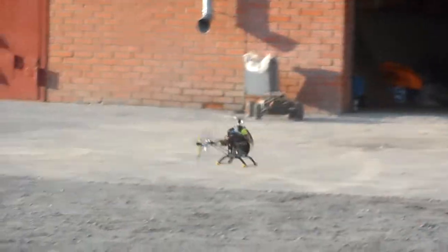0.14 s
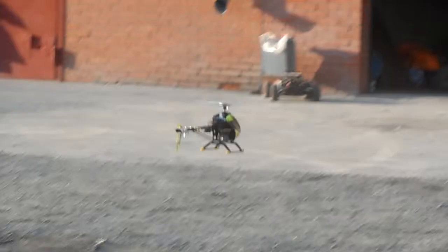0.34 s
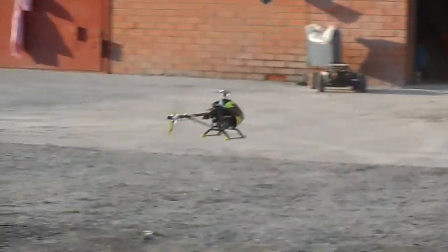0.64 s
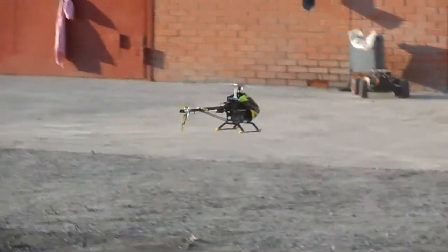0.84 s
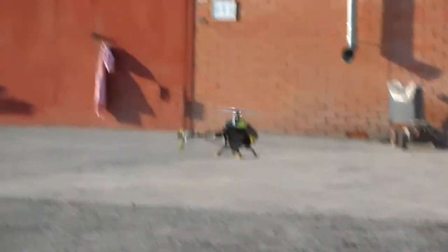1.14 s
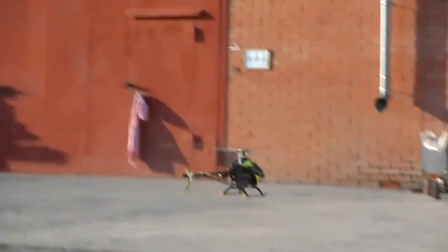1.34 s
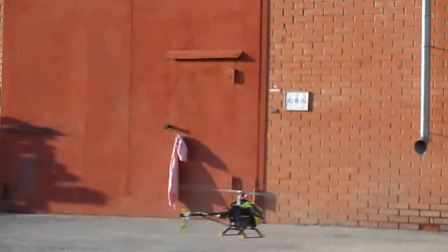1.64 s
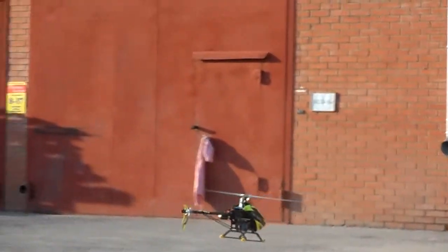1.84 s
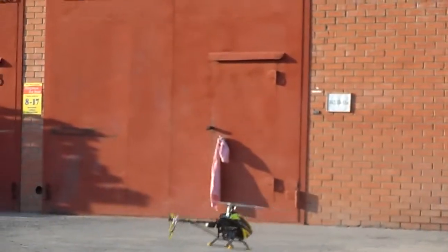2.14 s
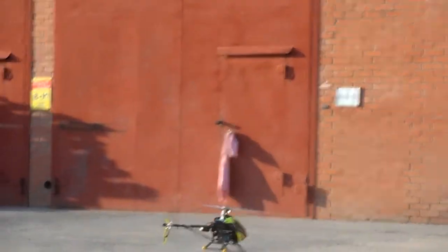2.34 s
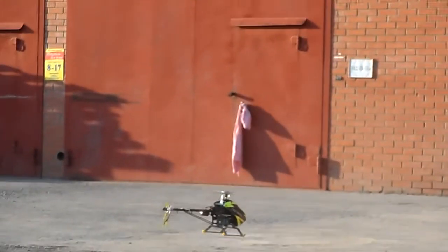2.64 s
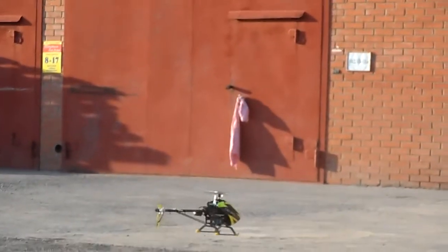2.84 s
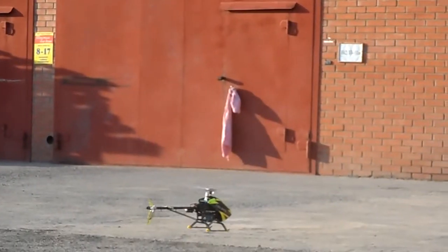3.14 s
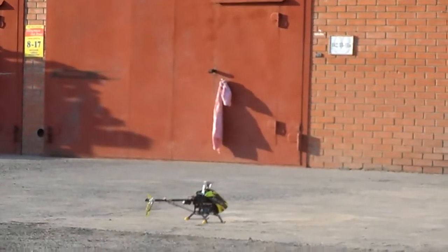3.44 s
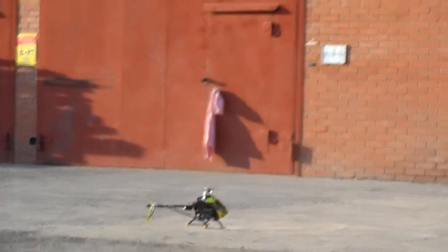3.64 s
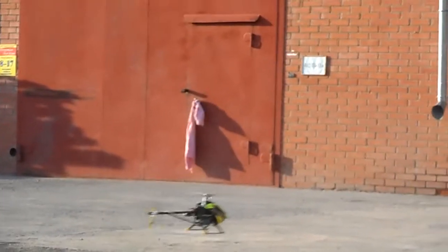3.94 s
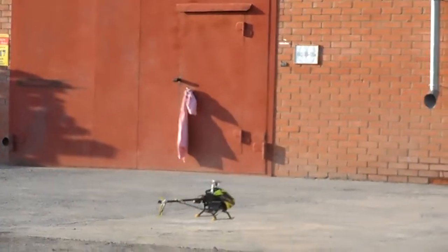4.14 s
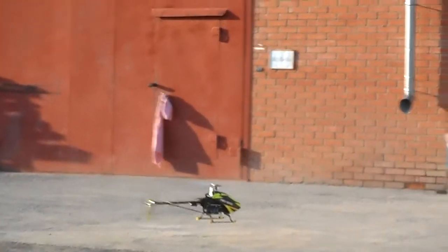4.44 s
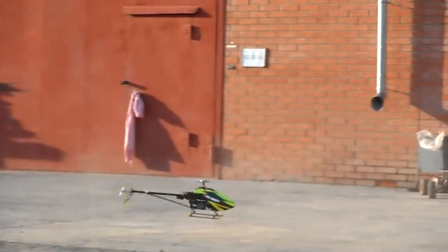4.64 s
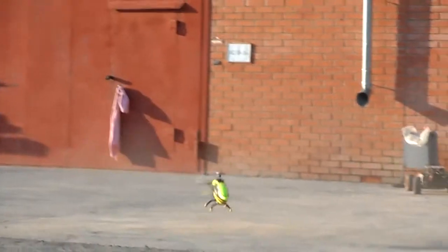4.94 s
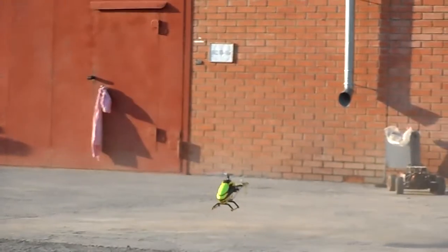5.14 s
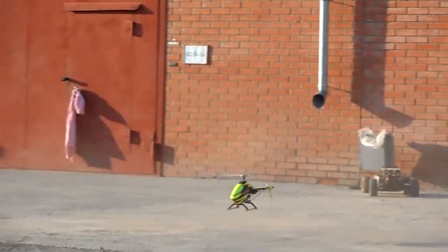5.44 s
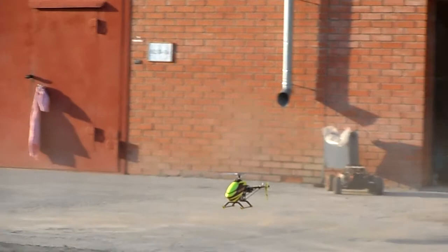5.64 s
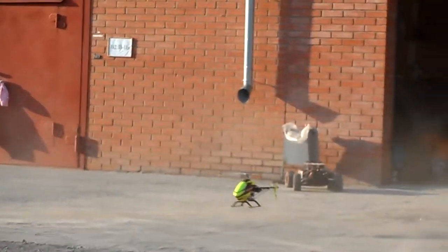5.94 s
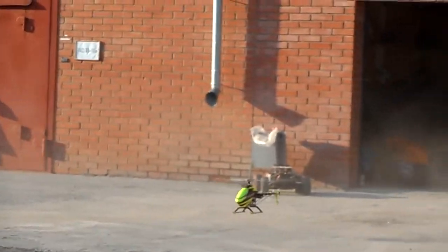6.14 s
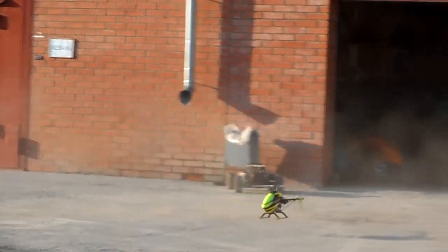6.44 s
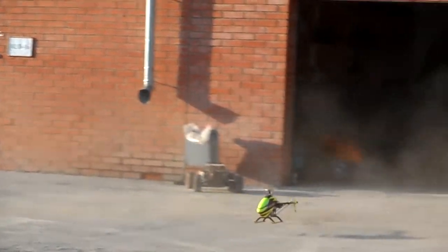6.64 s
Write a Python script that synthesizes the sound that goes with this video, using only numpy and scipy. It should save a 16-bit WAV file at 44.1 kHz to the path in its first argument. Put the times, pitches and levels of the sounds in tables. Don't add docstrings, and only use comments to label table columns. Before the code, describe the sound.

Loud wind buffeting batters an unprotected microphone over a model helicopter's high metallic gear whine, which swells with a lower tonal hum as it turns.

```python
import sys
import numpy as np
from scipy import signal
from scipy.fft import irfft
from scipy.io import wavfile
from scipy.ndimage import uniform_filter1d

SR = 44100
rng = np.random.default_rng(int(sys.argv[2]) if len(sys.argv) > 2 else 0)


def boost(x):
    u = np.asarray(x, float) / 20
    return 10 ** u


def unload_audio(sound):
    columns = np.transpose(np.atleast_2d(sound))
    steps = np.round(np.clip(columns, -1, 1) * 32767)
    wavfile.write(sys.argv[1], SR, steps.astype(np.int16))


N = 298838

TAIL_PER_MOTOR, ROTOR_PER_MOTOR = 0.43303, 0.092593
BLOCK, FIRST_SEAM, GLITCH = 1024, 1004, 16


def rms_one(x):
    return x / np.sqrt(np.mean(x ** 2) + 1e-20)


def evened(x, count):
    power = uniform_filter1d(uniform_filter1d(x ** 2, size=count), size=count)
    return x / np.sqrt(power + 1e-20)


def in_time(rows):
    s, *columns = np.transpose(rows)
    return [np.interp(np.arange(N) / SR, s, c) for c in columns]


def drift(rate_hz, coarse=False):
    r = np.exp(-80 * np.pi * rate_hz / SR)
    slow = signal.lfilter([1], [1, -2 * r, r * r], rng.standard_normal(N // 40 + 2002))[2000:]
    slow = rms_one(slow)
    if coarse:
        return rms_one(slow)[:(N + 39) // 40]
    return np.interp(np.arange(N) / 40, np.arange(len(slow)), slow)


def band(x, low_hz, high_hz, order=2):
    return signal.sosfilt(signal.butter(order, [low_hz, high_hz], "band", fs=SR, output="sos"), x)


def swells(rows, rest_db):
    t = np.arange(0, N + 40, 40) / SR
    power = boost(2 * rest_db)
    for s, length, db in rows:
        reach = 0.42 * length
        power = power + boost(2 * db) * np.exp(-2 * np.abs((t - s) / reach) ** 1.56)
    return np.interp(np.arange(N) / SR, t, 10 * np.log10(power))


def heading():
    # time in seconds, nearness in dB, tail swung toward us in dB,
    # downwash on the ground in dB.
    pose = [(0, 0, -0.5, 5), (.75, -0.7, -1, 3), (1.1, -1.2, 3, 6), (1.5, 0.3, 2, 6.5),
            (2.17, -1, 1.5, 7.5), (2.38, -3.5, 3.5, 7), (2.62, 0, 0.5, 4.5), (2.9, -2, 2.5, 7),
            (3.15, -3.5, 7, 10), (3.6, -0.5, 3, 3), (3.75, -1.5, 3.5, 6), (4.25, -0.5, 4, 4.5),
            (4.6, -1.2, 4, 5.5), (5.1, -2, 9, 8), (5.52, 6.5, 3, 13.5), (5.9, 3, 3, 12),
            (6.25, -2, -0.5, 6.5), (6.78, -5, 5.5, 11)]
    # share of tail swing, share of downwash, offset in dB.
    motor_shares = (0.031, 0.61, -3)
    near, tail, wash = in_time(pose)
    of_tail, of_wash, offset_db = motor_shares
    return [near + wash, near + tail, near + of_tail * tail + of_wash * wash + offset_db, near]


def toward_us(heading_db, hz):
    curve_hz = [1400, 4900, 6700, 12400]
    place = np.interp(np.log(hz), np.log(curve_hz), np.arange(len(curve_hz)))
    k = min(int(place), len(curve_hz) - 2)
    return heading_db[k] + (place - k) * (heading_db[k + 1] - heading_db[k])


def beams(t):
    # time in seconds, beam (+) or null (-) in dB.
    sweeps = [
        [(.4, 6), (1.15, 3), (2.7, 3), (2.97, -1), (3.7, -0.5), (4.5, 5), (5.45, -4), (6.2, -4), (6.7, -8)],
        [(.15, 9), (.65, 11.5), (1.05, 5), (2.7, -1), (3.7, 2), (5.1, 6), (5.5, -1), (5.9, 6), (6.35, -9)],
        [(.2, 6), (.9, 1.5), (1.8, -1), (3.8, -1), (4.9, 1), (5.5, 3)],
        [(1.8, -18), (2.4, 9), (3.7, -13), (4.95, 6), (5.45, -7), (6.0, 5.5), (6.45, 10)],
        [(.1, -8), (1.0, 1), (2.6, 1), (3.8, 12), (4.95, 14), (5.6, 6), (6.2, 2), (6.7, -4)],
        [(.2, 4), (.9, -3), (1.3, 4), (1.8, -3), (2.2, -3), (2.6, 3.5), (3.4, 4), (3.8, 2), (4.2, 2),
         (4.92, -5), (5.6, 3)],
    ]
    return [sum(db * np.exp(-((t - s) / 0.25) ** 2) for s, db in lobe) for lobe in sweeps]


def drive_train(turns, heading_db, fade_db, flutter_db):
    # multiple of tail shaft turns, level in dB rms.
    tail_gear = [(25, -46), (26, -58), (27, -48), (28, -62), (30, -58), (31, -50.5), (49, -51), (50, -52),
                 (51, -54), (60, -52), (62, -46), (64, -58)]
    # multiple of motor turns, level in dB rms.
    motor = [(14, -53), (15, -51), (16, -41), (17, -45), (18, -53), (21, -51), (25, -57), (29, -54),
             (30, -44), (31, -46)]
    # multiple of main rotor turns, level in dB rms.
    main_gear = [(312, -46), (322, -55), (328, -49), (336, -47)]
    # motor multiple, rotor multiple added, level in dB rms.
    gear_wobble = [(16, 1, -53), (16, 2, -47), (16, 3, -51), (17, -2, -54), (17, -1, -50), (17, 1, -52),
                   (17, 2, -49), (31, -12, -51), (31, 4, -51)]
    lobe_tones_hz = [
        [4836, 7031, 11104, 11948],
        [6204, 12822, 12868],
        [5552, 6618, 12408],
        [5790],
        [4657, 5017, 5376],
        [4478],
    ]
    lines = [(round(k) * TAIL_PER_MOTOR, db) for k, db in tail_gear]
    lines += [(round(k), db) for k, db in motor]
    lines += [(round(k) * ROTOR_PER_MOTOR, db) for k, db in main_gear]
    lines += [(round(k) + round(j) * ROTOR_PER_MOTOR, db) for k, j, db in gear_wobble]
    mean_motor_hz = turns[-1] * SR / N
    lobes_db = beams(np.arange(0, N, 40) / SR)
    heading_db = [db[::40] for db in heading_db]
    out = np.zeros(N)
    for multiple, db in lines:
        hz = multiple * mean_motor_hz
        wander_db = fade_db * drift(0.36, coarse=True)
        for lobe_db, tones in zip(lobes_db, lobe_tones_hz):
            if np.abs(hz - np.array(tones)).min() < 120:
                wander_db = lobe_db
        flutter = flutter_db * drift(7.0, coarse=True)
        level_db = db + toward_us(heading_db, hz) + wander_db + flutter
        height = np.repeat(np.sqrt(2) * boost(level_db), 40)[:N]
        out += height * np.sin(2 * np.pi * (multiple * turns + rng.random()))
    return out


def tail_rotor(turns):
    # centre in seconds, length in seconds, level in dB rms.
    blade_swells = [
        [(2.0, 0.4, -46), (3.15, 0.86, -42), (3.58, 0.27, -41.5), (4.85, 0.16, -41), (5.5, 0.53, -25),
         (5.82, 0.26, -33), (6.08, 0.34, -31), (6.45, 0.16, -37), (6.64, 0.38, -35.5)],
        [(.3, .8, -63), (3.6, 0.11, -45), (4.72, .4, -48), (5.6, 0.5, -52), (6.0, 0.23, -45), (6.27, 0.23, -46),
         (6.58, 0.25, -45.5)],
        [(3.1, .4, -56), (3.6, 0.48, -51), (3.95, 0.6, -48), (5.0, 0.49, -36.5), (6.1, 0.82, -60)],
    ]
    rests_db = [-54, -60, -59]
    blade_phase = 2 * 2 * np.pi * TAIL_PER_MOTOR * turns
    out = np.zeros(N)
    for k, (rows, rest_db) in enumerate(zip(blade_swells, rests_db), start=1):
        height = np.sqrt(2) * boost(swells(rows, rest_db) + 1.6 * drift(20.0))
        out += height * np.sin(k * blade_phase + 0.39 * drift(1.3))
    return out


def main_rotor(turns, wash_db):
    # multiple of main rotor turns, level in dB rms.
    blade_orders = [
        (2, -36),
        (4, -42.5),
    ]
    rotor = 2 * np.pi * ROTOR_PER_MOTOR * turns
    out = np.zeros(N)
    for k, db in blade_orders:
        level_db = db + 0.4 * (wash_db - 10.5) + 2.3 * drift(5.4)
        out += np.sqrt(2) * boost(level_db) * np.sin(round(k) * rotor + 0.33 * drift(5.4))
    return out


def blade_hiss(turns, heading_db, patchy_db, chop, grind):
    # frequency in Hz, density in dB per Hz.
    spectrum = [(150, -111), (450, -74), (1000, -78), (1400, -76.5), (1850, -82), (2400, -74),
                (4000, -75.5), (5400, -75), (7700, -75.5), (10000, -70), (12900, -74.5), (13600, -84),
                (14600, -88), (15600, -92)]
    # frequency in Hz, width in Hz, level in dB.
    resonances = [
        (4700, 670, -4),
        (6870, 740, 1.5),
        (8580, 410, -3),
        (12740, 1150, 3.5),
    ]
    edges = 120 * 2 ** np.arange(0, 7.1, 1 / 4)
    white = rng.standard_normal((2, N))
    hz, db = np.transpose(spectrum)
    together = drift(30.0)
    out = np.zeros(N)
    for k, (low, high) in enumerate(zip(edges, edges[1:])):
        centre = np.sqrt(low * high)
        level_db = np.interp(np.log(centre), np.log(hz), db) + toward_us(heading_db, centre)
        level_db = level_db + patchy_db * (0.74 * together + drift(3.5))
        out += boost(level_db) * band(white[k % 2], low, high)
    out *= np.sqrt(SR / 2)
    rotor = 2 * np.pi * ROTOR_PER_MOTOR * turns
    rung = np.zeros(N)
    for ring_hz, width_hz, ring_db in resonances:
        r = np.exp(-np.pi * width_hz / SR)
        poles = [1, -2 * r * np.cos(2 * np.pi * ring_hz / SR), r * r]
        ring = signal.lfilter([(1 - r * r) / 2, 0, (r * r - 1) / 2], poles, out)
        rung += boost(ring_db) * ring * (1 + chop * np.sin(rotor + 2 * np.pi * rng.random()))
    return (out + rung) * (1 + grind * np.sin(2 * np.pi * turns))


def shaft_buzz(turns, heading_db):
    multiple = np.arange(3, 72)
    uneven = boost(3 * rng.standard_normal((2, 69)))
    phase = np.exp(2j * np.pi * rng.random((2, 69)))
    shape = np.zeros((2, 2049), complex)
    shape[:, multiple] = np.minimum(multiple / 24, 1) ** 0.5 * uneven * phase
    place = TAIL_PER_MOTOR * turns % 1 * 4095
    buzz = np.zeros(N)
    for wave in irfft(shape):
        buzz += boost(4 * drift(4.0)) * np.interp(place, np.arange(4096), rms_one(wave))
    return boost(-53 + heading_db[1]) * buzz


def ground_echo(x):
    # time in seconds, near lag in ms, far lag in ms.
    lags = [
        (0, 0.51, 1.7),
        (1.2, 0.55, 1.98),
        (2.4, 0.61, 1.8),
        (3.2, 0.52, 1.84),
        (4.2, 0.6, 1.85),
        (5.0, 0.5, 1.82),
        (6.0, .55, 1.88),
        (6.78, 0.66, 1.88),
    ]
    shares = (.08, .25)
    out = x
    for share, ms in zip(shares, in_time(lags)):
        out = out + share * np.interp(np.arange(N) - ms * SR / 1000, np.arange(N), x)
    return out / np.sqrt(1 + np.sum(np.square(shares)))


def wind():
    # centre in seconds, length in seconds, large eddies in dB rms,
    # smaller eddies in dB rms.
    gusts = [(.19, 0.27, -10, -14), (.33, 0.18, 2, -8.5), (.49, 0.22, -4.5, -15), (.67, 0.24, -23, -13.5),
             (.86, 0.38, -10, -13), (1.03, 0.17, -1.7, -10), (1.17, 0.17, -9.5, -6.5),
             (1.33, 0.26, -4, -16), (1.47, 0.18, -5.5, -10), (1.58, 0.22, 2.7, -9.5),
             (1.77, 0.18, -5.5, -10.5), (1.93, 0.32, -11.5, -32), (2.25, 0.28, -13.5, -50),
             (2.42, 0.27, -13.5, -19.5), (2.58, 0.23, -14.5, -19), (2.839, 0.31, -11, -15.5),
             (2.968, 0.056, 0.5, -24), (3.12, 0.3, -4.5, -27), (3.321, 0.23, -6.5, -13),
             (3.462, 0.092, -11.5, -23.5), (3.86, 0.31, -13.5, -27), (4.1, 0.18, -10.5, -24),
             (4.422, 0.29, -0.6, -8), (4.67, 0.47, -3.5, -14), (4.93, 0.21, -2.5, -2.5), (5.21, 0.5, 3, -9),
             (5.5, 0.26, 0.5, -23), (5.669, .15, 1.5, -8.5), (6.02, 0.45, -19.5, -42),
             (6.66, 0.59, -26, -53), (.03, 0.11, -16, -27), (.25, 0.044, -14, -14), (.29, .05, -5, 2),
             (.46, 0.048, -6, -13), (.775, 0.047, -12, -18), (1.03, 0.057, -8, -15),
             (2.18, 0.033, -16.5, -28.5), (2.45, 0.027, -14, -19), (2.72, 0.1, -13.5, -18),
             (3.74, 0.081, -17, -36), (3.97, 0.078, -10, -21), (4.31, 0.035, -3, -9),
             (4.55, 0.17, -4.5, -12), (4.8, .12, 0, -8), (4.965, 0.054, -2, 0), (5.08, 0.047, -8, -19),
             (5.35, 0.31, -3, -13), (5.82, .15, -13.5, -34), (6.551, 0.072, -27, -43)]
    fine_db = [-28.5, -19, -19.5, -30, -25, -15.5, -22, -41, -34, -14, -30, -53, -55, -36, -48, -42, -37,
               -40, -39, -45, -39.5, -38, -33, -31, -22, -29, -44, -39, -42, -55, -33.5, -25.5, -17.5, -8.5,
               -16.5, -16, -59, -28, -51, -47, -27, -28, -29, -26, -8.5, -35, -34, -36, -52]
    # time in seconds, level in dB rms, bright edge in dB.
    buffets = [(0.18, -6.5, -36), (0.288, -0.5, -12), (0.377, -13.5, -29), (0.457, -11, -40),
               (0.511, -11, -20), (0.775, -16.5, -30), (0.812, -8, -29), (0.901, -12, -32),
               (1.023, -13, -9), (1.232, -13.5, -28), (1.301, -11, -8), (1.518, -15, -30),
               (1.595, -7.5, -28), (2.304, -17.5, -21), (2.355, -16, -30), (2.444, -11.5, -28),
               (2.49, -17, -28), (2.57, -15, -33), (2.758, -25, -28), (3.307, -26, -30), (3.335, -20, -25),
               (3.742, -35, 2), (3.808, -26, -4), (2.959, -24, -20), (3.472, -28, -7), (3.913, -21.5, -18),
               (3.98, -25, -4), (4.313, -38, -18), (4.435, -18, -27), (4.65, -21, -29), (4.788, -11.5, -5),
               (4.969, -2, -36), (5.259, 2.5, -11.5), (5.435, -7, -25), (0.235, -18.5, -12),
               (0.415, -10, -20), (0.691, -14.5, -22.5), (0.878, -15, -13), (1.065, -14, -18),
               (4.359, -13, -22), (4.468, -12.5, -17), (4.61, -23, -12), (2.599, -26.5, -27),
               (5.671, -9, -29)]
    large_db = swells([row[:3] for row in gusts], rest_db=-30.5)
    middle_db = swells([(s, length, db) for s, length, _, db in gusts], rest_db=-62)
    small_db = swells([(*row[:2], db) for row, db in zip(gusts, fine_db)], rest_db=-60)
    white = rng.standard_normal((4, N + SR))
    t = np.arange(N) / SR
    large = evened(band(white[0], 24.1, 72.8)[SR:], count=4500) * boost(large_db + 2.26 * drift(9.2))
    middle = evened(band(white[1], 91.0, 156.6)[SR:] * boost(10.4 * drift(12.3)), count=2500)
    small = evened(band(white[2], 170.0, 306.0)[SR:] * boost(4.8 * drift(20.0)), count=2500)
    finest = band(white[1], 326.0, 578.0, order=3)[SR:] * boost(13.0 * drift(30.0))
    small += boost(-17) * evened(finest, count=2500)
    small *= boost(small_db)
    puff = evened(band(white[3], 122.0, 333.0, order=3)[SR:], count=500)
    edge = evened(band(white[0], 375.0, 750.0)[SR:], count=300)
    puff_env, edge_env = np.zeros(N), np.zeros(N)
    for s, db, edge_db in buffets:
        near = slice(max(int((s - 0.1) * SR), 0), int((s + 0.1) * SR))
        puff_env[near] += boost(db) * np.exp(-((t[near] - s) / 0.0054) ** 2)
        edge_env[near] += boost(db + edge_db) * np.exp(-((t[near] - s) / 0.003) ** 2)
    dull = signal.butter(2, 600.0, fs=SR, output="sos")
    eddies = large + signal.sosfilt(dull, middle * boost(middle_db) + small)
    air = eddies + puff * puff_env + edge * edge_env
    size = np.sqrt(uniform_filter1d(air ** 2, size=4000) + 1e-12)
    suction = band(air ** 2 / size, 11.0, 445.0)
    return air - 0.15 * suction


def thumps():
    # time in seconds, depth in dB, sharpness in Hz.
    plunges = [
        (0.301, -1, 700),
        (.313, 5.5, 497),
        (0.692, -18, 400),
        (0.764, -12, 495),
        (0.782, -6, 450),
        (0.871, -7, 500),
        (3.114, -2, 497),
        (4.785, -13, 600),
        (5.257, 0.5, 880),
    ]
    t = np.arange(SR // 20) / SR
    out = np.zeros(N)
    for s, db, sharp_hz in plunges:
        plunge = np.exp(-t / 0.003) - np.exp(-2 * np.pi * sharp_hz * t)
        start = round(s * SR)
        out[start:start + len(t)] -= boost(db) * plunge
    return out


def scene():
    # time in seconds, motor turns in Hz as heard.
    speed = [(0, 414.6), (.6, 414.4), (1.0, 412.4), (1.25, 412.9), (1.62, 416.5), (1.86, 417.5),
             (2.25, 414.5), (2.62, 413.0), (3.0, 412.7), (3.7, 413.8), (4.57, 413.3), (4.88, 407.9),
             (5.12, 411.7), (5.44, 420.1), (5.65, 419.7), (6.12, 413.8), (6.38, 412.1), (6.78, 413.3)]
    (motor_hz,) = in_time(speed)
    heading_db = heading()
    turns = np.cumsum(motor_hz) / SR + 0.002 * drift(30.0)
    whine = drive_train(turns, heading_db, fade_db=2.0, flutter_db=2.2) + tail_rotor(turns)
    hiss = blade_hiss(turns, heading_db, patchy_db=0.5, chop=0.55, grind=0.2)
    hiss = ground_echo(hiss + shaft_buzz(turns, heading_db))
    return (whine + hiss + main_rotor(turns, heading_db[0]) + wind() + thumps())[None]


def gain_control():
    # time in seconds, gain it falls to in dB.
    ducks = [(.139, -4), (.186, -6), (0.284, -10), (0.316, -13.5), (.45, -9), (0.785, -7), (.873, -8.5),
             (.96, -8.5), (1.03, -11), (1.19, -6), (1.295, -10.5), (1.4, -11), (1.5, -11.5), (1.603, -16),
             (2.968, -15.5), (4.309, -10.5), (4.475, -14.5), (4.56, -14.5), (4.63, -14), (4.78, -12),
             (4.916, -14), (5.0, -15), (5.1, -17.5), (5.18, -18), (5.261, -23.5), (5.32, -26.5),
             (5.67, -10.5), (5.87, 5)]
    hold_s, recover_db_per_s, full_gain_db = 0.06, 26, -2.5
    t = np.arange(0, N + 40, 40) / SR
    gain_db = np.full(len(t), full_gain_db)
    for s, db in ducks:
        recovering = db + recover_db_per_s * np.maximum(t - s - hold_s, 0)
        gain_db = np.where(t >= s, np.minimum(gain_db, recovering), gain_db)
    return uniform_filter1d(np.repeat(gain_db, 40)[:N], size=300)


def seam_jumps(x, skip):
    # time in seconds, height as a share of full scale.
    strong = [(0.139, 0.74), (0.185, 0.66), (0.232, 0.086), (0.255, 0.12), (0.348, 0.13), (0.371, 0.17),
              (0.464, 0.26), (0.487, 0.087), (0.975, 0.11), (0.998, 0.2), (1.161, 0.14), (1.207, 0.14),
              (1.23, 0.2), (1.509, 0.16), (1.602, 0.65), (2.484, 0.24), (2.902, 0.16), (2.949, 0.11),
              (3.32, 0.17), (3.343, 0.14), (4.133, 0.18), (4.295, 0.19), (4.319, 0.17), (4.411, 0.085),
              (4.435, 0.25), (4.458, 0.37), (4.829, 0.2), (4.969, 0.27), (4.992, 0.1), (5.665, 0.13),
              (0.394, 0.055), (0.417, 0.056), (0.51, 0.059), (0.58, 0.044), (0.766, 0.068), (0.835, 0.085),
              (1.068, .07), (1.114, .07), (1.137, 0.046), (1.37, 0.089), (2.832, 0.11), (3.087, 0.055),
              (3.157, .06), (3.273, 0.041), (3.868, 0.08), (4.527, 0.058), (4.574, .05), (4.597, 0.073),
              (5.909, 0.063)]
    seams = np.arange(FIRST_SEAM, N - BLOCK // 8, BLOCK)
    rumble = uniform_filter1d(x, size=80)
    height = skip * np.gradient(rumble)[seams] * rng.random(len(seams))
    height = np.clip(height, -0.043, 0.043)
    for s, jump in strong:
        k = np.abs(seams - s * SR).argmin()
        height[k] = 0.7 * abs(jump) * np.sign(1e-12 - rumble[seams[k]])
    kinks = np.zeros(N)
    kinks[seams] = height
    kinks[seams + GLITCH] = -0.4 * height
    settle = np.exp(-1 / (0.016 * SR))
    soft = np.exp(-2 * np.pi * 3500 / SR)
    steps = signal.lfilter([1], [1, -settle], kinks)
    return signal.lfilter([1 - soft], [1, -soft], steps)


def seam_ticks(x):
    seams = np.arange(FIRST_SEAM + GLITCH // 2, N, BLOCK)
    whine = np.sqrt(uniform_filter1d(np.diff(x, prepend=0) ** 2, size=BLOCK))
    ticks = np.zeros(N)
    ticks[seams] = 1.1 * whine[seams] * rng.laplace(size=len(seams))
    return ticks


def top_cut(x):
    return signal.sosfilt(signal.butter(12, 15730, fs=SR, output="sos"), x)


def record(dry):
    x = dry[0] * boost(gain_control())
    x = x + seam_jumps(x, skip=38.0) + seam_ticks(x)
    swing, ceiling = uniform_filter1d(x, size=9), 0.62
    x = x - swing + swing / (1 + np.abs(swing / ceiling) ** 6) ** (1 / 6)
    return top_cut(x[None])


dry = scene()
out = record(dry)
unload_audio(out)
```